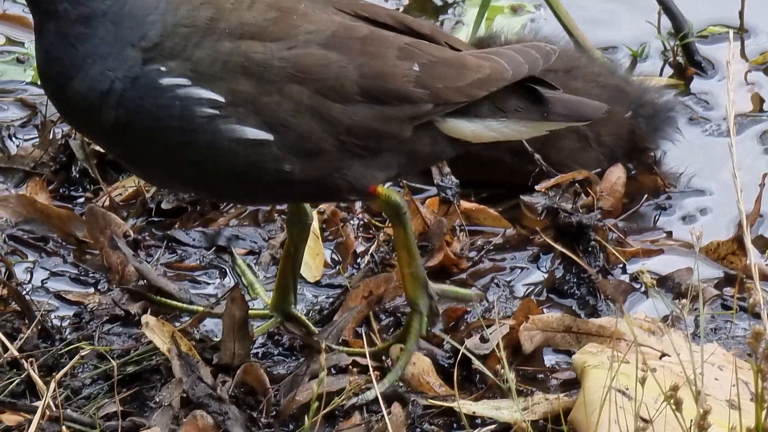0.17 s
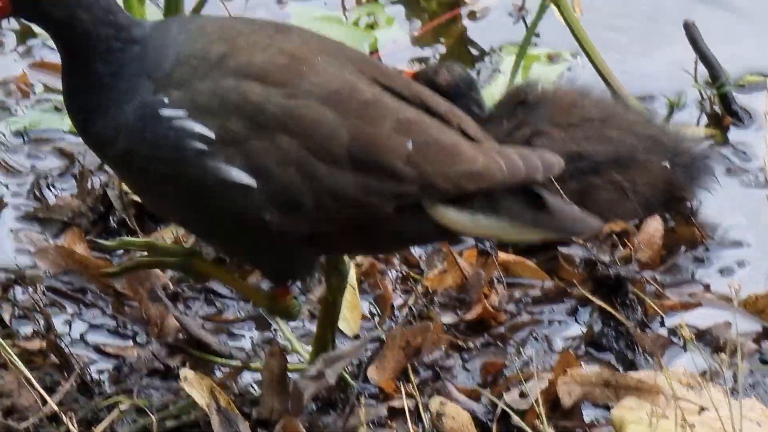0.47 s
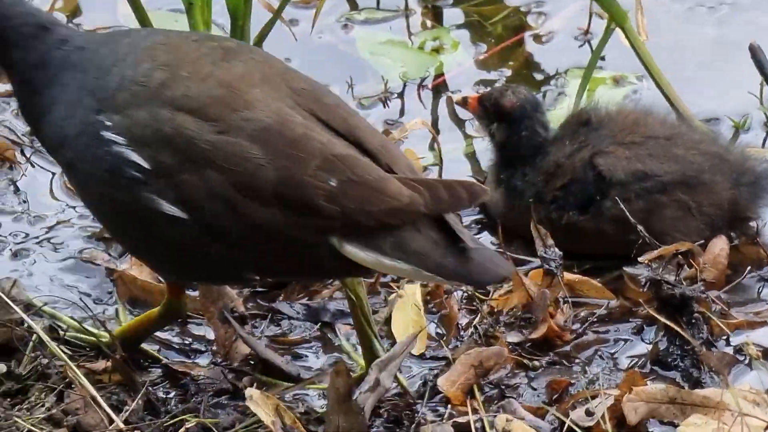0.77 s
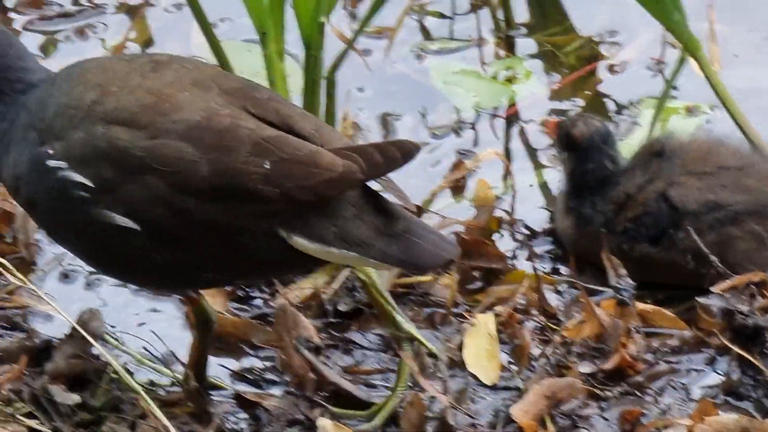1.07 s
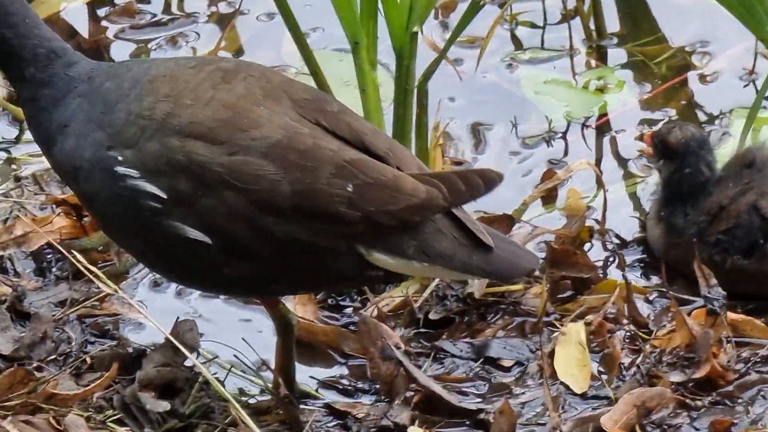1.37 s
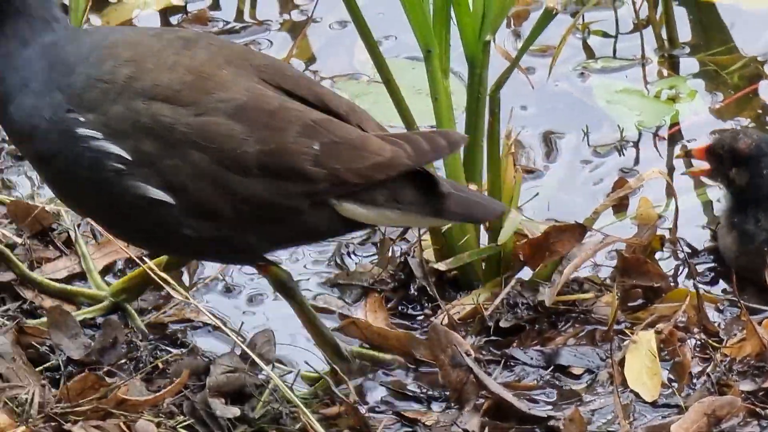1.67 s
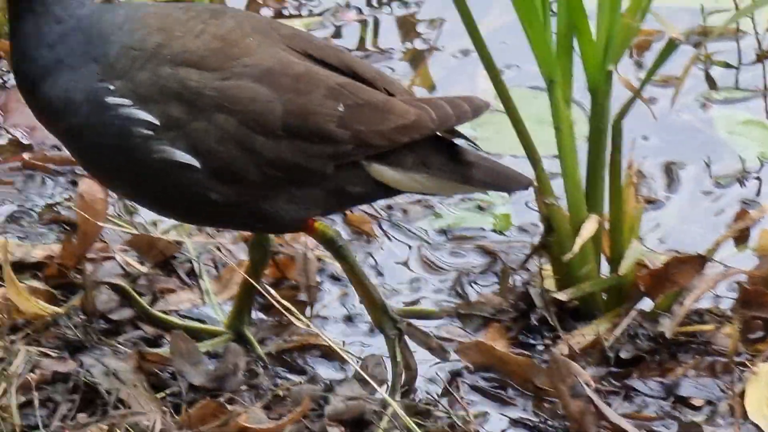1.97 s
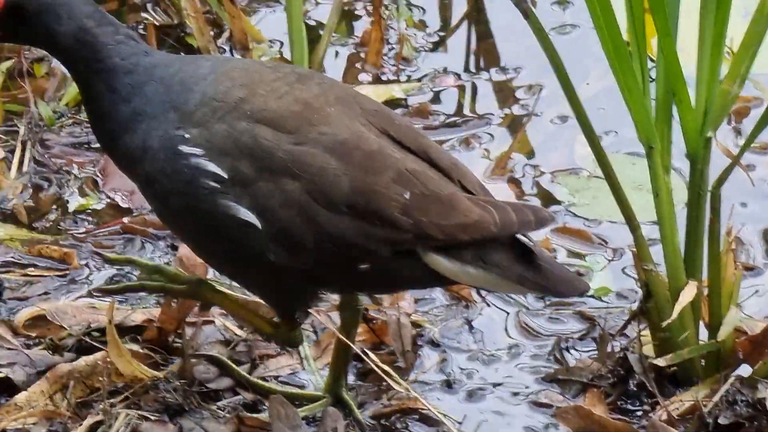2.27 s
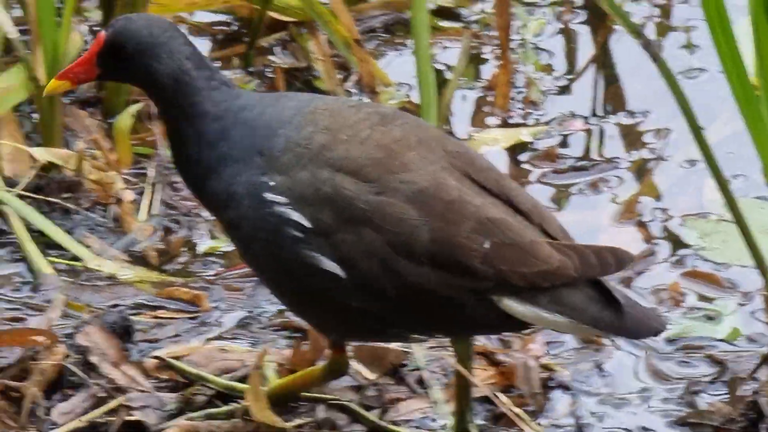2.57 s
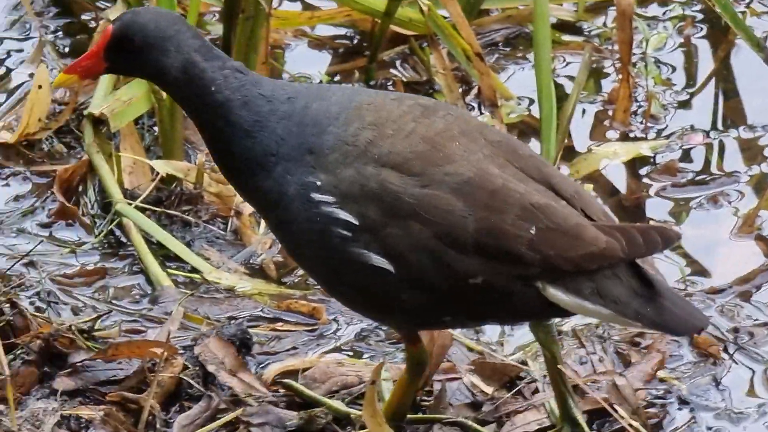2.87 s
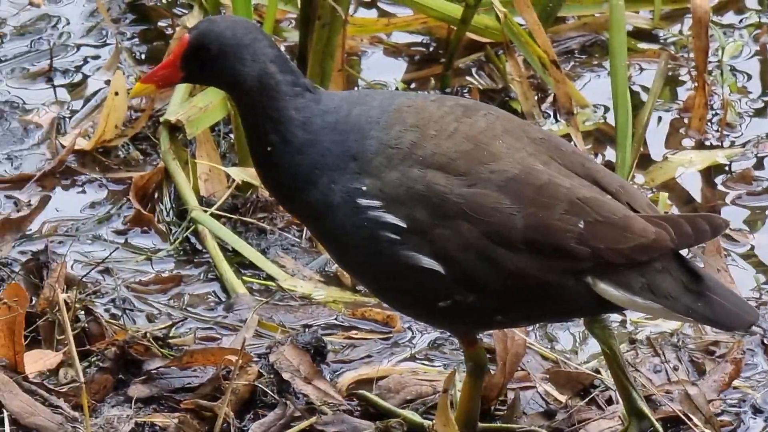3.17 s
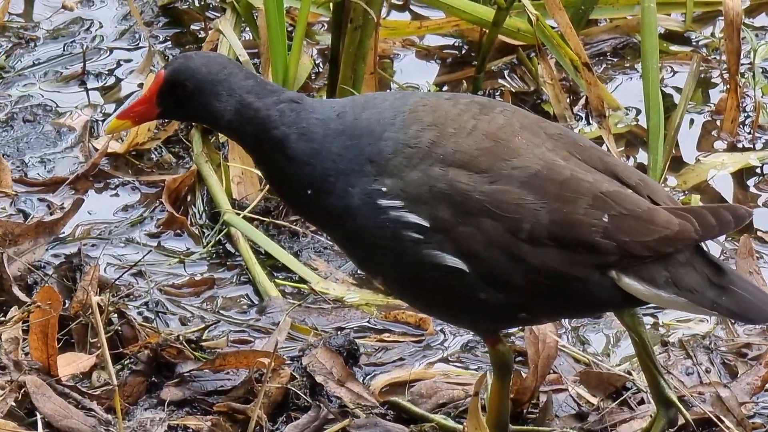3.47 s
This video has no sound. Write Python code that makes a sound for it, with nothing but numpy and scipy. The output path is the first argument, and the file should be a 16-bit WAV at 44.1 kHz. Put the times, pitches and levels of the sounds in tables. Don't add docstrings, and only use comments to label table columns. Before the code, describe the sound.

Harsh moorhen screeches, raspy chirps and one falling whistle at a quiet pond edge.

```python
import sys
import numpy as np
from scipy import signal
from scipy.fft import rfft, irfft
from scipy.io import wavfile
from scipy.ndimage import uniform_filter1d

SR = 44100
rng = np.random.default_rng(int(sys.argv[2]) if len(sys.argv) > 2 else 0)


def log_audio(samples):
    frames = np.atleast_2d(samples).T
    limited = np.clip(frames, -1, 1)
    pcm = np.round(limited * 32767).astype(np.int16)
    wavfile.write(sys.argv[1], SR, pcm)


def magnitude_from_level(level_db):
    exponent = np.asarray(level_db, float) / 20
    return 10 ** exponent


N = 159201
T = np.arange(N) / SR
LAG_S = 0.00003
JITTER_HZ = 400


def slow(hz):
    x = signal.lfilter(*signal.butter(2, hz, fs=SR), rng.standard_normal(N))
    return x / x.std()


def place(x, pan_db, lag_s=LAG_S):
    left = x * magnitude_from_level(pan_db / 2)
    right = np.roll(x, int(lag_s * SR)) * magnitude_from_level(-pan_db / 2)
    return np.array([left, right])


def bed(shape, db, step, swell_db, flicker_db):
    side_turn_hz, side_low_db, lean_db = 810, -14.5, -1.4
    f = np.fft.rfftfreq(N, 1 / SR) + 1e-9
    pts = np.array(shape)
    colour = magnitude_from_level(np.interp(np.log(f), np.log(pts[:, 0]), pts[:, 1], left=-60, right=-90))
    side = np.minimum(1, np.hypot(magnitude_from_level(side_low_db), (f / side_turn_hz) ** 1.48))
    mid_side = rfft(rng.standard_normal((2, N))) * colour * np.array([np.ones_like(f), side])
    where = np.log2(f / pts[0, 0]) / step
    bands = int(np.log2(pts[-1, 0] / pts[0, 0]) / step) + 2
    swell = slow(0.24)
    out = 0
    for k in range(bands):
        band = irfft(mid_side * np.clip(1 - abs(where - k), 0, 1), N)
        out = out + band * magnitude_from_level(swell_db * swell + flicker_db * slow(7.6))
    mid, side = out * magnitude_from_level(db) / out[0].std()
    return np.array([(mid + side) * magnitude_from_level(lean_db / 2), (mid - side) * magnitude_from_level(-lean_db / 2)])


def far_traffic():
    # (frequency [Hz], level [dB per Hz])
    rumble = [(16, -53), (28, -34.5), (42, -0.5), (64, 1.5), (210, -19), (303, -17), (370, -20), (491, -26),
              (1500, -36), (1950, -63), (3300, -120)]
    return bed(rumble, -48, 0.527, swell_db=0.0, flicker_db=0.52)


def open_air():
    # (frequency [Hz], level [dB per Hz])
    hiss = [(1500, 0), (3000, 3), (5000, -2.5), (7000, -6), (8200, -15.5), (10500, -20), (12000, -14.5),
            (16000, -13)]
    fade_db_s = -1.2
    return bed(hiss, -67.5, 0.513, swell_db=-1.0, flicker_db=0.77) * magnitude_from_level(fade_db_s * (T - T.mean()))


def machine_hum():
    hum_hz, hum_db = 300, -67.5
    return magnitude_from_level(hum_db + 1.4 * slow(14)) * np.sin(2 * np.pi * hum_hz * T + 0.15 * slow(13.0))


def leaves():
    # (time [s], level [dB])
    leaf_ticks = [(.82, -59), (.861, -59), (1.168, -52), (1.3, -57.5), (1.392, -63), (1.826, -76),
                  (2.027, -70), (2.274, -56.5), (2.431, -57), (2.753, -64), (3.365, -59)]
    drip_s, drip_hz, drip_db, drip_t60_s = 1.97, 560, -42, 0.011
    decay_s = 0.0024
    strength = sum(magnitude_from_level(db) * (T > s) * np.exp(-np.abs(T - s) / decay_s) for s, db in leaf_ticks)
    crack = strength * rng.standard_normal((2, N))
    u = np.maximum(T - drip_s, 0)
    drip = magnitude_from_level(drip_db - 60 * u / drip_t60_s) * np.sin(2 * np.pi * drip_hz * u)
    return signal.lfilter(*signal.butter(1, 4000, "high", fs=SR), crack) + drip


def trees(x):
    t60_s, gap_s, echo_db = 0.2, 0.00075, -8
    t = T[:SR // 2]
    tail = rng.standard_normal((2, len(t))) * magnitude_from_level(-60 * t / t60_s) * np.clip(t / gap_s, 0, 1)
    tail = signal.lfilter(*signal.butter(2, [2800, 7270], "band", fs=SR), tail)
    tail *= magnitude_from_level(echo_db) / np.sqrt(np.sum(tail ** 2, axis=1, keepdims=True))
    return signal.fftconvolve(x, tail, axes=1)[:, :N]


def throat(x, shape):
    hz, db = np.array(shape).T
    f = np.fft.rfftfreq(N, 1 / SR) + 1
    return irfft(rfft(x) * magnitude_from_level(np.interp(np.log(f), np.log(hz), db)), N)


def shake(rough):
    swell_db, flutter_hz = 3.5, 170
    swell = magnitude_from_level(swell_db * rough * slow(27))
    return swell * (np.sqrt(1 - rough) + np.sqrt(rough) * slow(flutter_hz))


def breath(rough):
    wheeze_db, rasp_db = -22, 1.5
    wheeze = magnitude_from_level(wheeze_db) * rough * np.diff(rng.standard_normal(N + 1))
    gape = signal.butter(3, [3300, 7200], "band", fs=SR)
    gusts = magnitude_from_level(rasp_db + 3.9 * slow(220)) * rough
    return wheeze + gusts * signal.lfilter(*gape, rng.standard_normal(N))


def syrinx(hz, gain, bright, rough, parts_db, sides_db, second_hz):
    jitter, second_jitter, first_side_db = 0.014, 0.033, -23
    rough = np.clip(rough, 0, 1)
    one = 2 * np.pi * np.cumsum(hz * (1 + jitter * rough * slow(JITTER_HZ))) / SR
    two = 2 * np.pi * np.cumsum(second_hz * (1 + second_jitter * slow(139))) / SR
    sides = [(j or -1, db) for j, db in enumerate(sides_db)]
    full = len(parts_db) > 0 and len(sides_db) > 0
    # (multiple of voice one, multiple of voice two, dB)
    upper = []
    for k, db in enumerate(parts_db):
        upper += [(k + 2, j, db + d) for j, d in [(0.00032, 0.033)] + sides]
    if not upper:
        upper = [(1, j, d) for j, d in sides]
    if full:
        upper += [(0.96, 1, first_side_db)]
    fundamental = shake(rough * (0.15 if full else 1)) * np.sin(one)
    overtones = sum(magnitude_from_level(db) * shake(rough) * np.sin(k * one + j * two) for k, j, db in upper)
    return np.sqrt(2) * gain * (fundamental + bright * (breath(rough) + overtones))


def call(rows, rough, parts_db=(), sides_db=(), second_hz=0):
    edge_s = 0.003
    s, hz, db, bright_db = np.array(rows).T
    gate = np.clip(np.minimum(T - s[0], s[-1] - T) / edge_s, 0, 1)
    pitch = np.interp(T, s, hz)
    gain = gate * magnitude_from_level(np.interp(T, s, db))
    return syrinx(pitch, gain, magnitude_from_level(np.interp(T, s, bright_db)), rough, parts_db, sides_db, second_hz)


def glides(rows, parts_db, rough, bend, rise):
    out = np.zeros(N)
    for start, length, hz0, hz1, db in rows:
        u = np.clip((T - start) / length, 0, 1)
        hz = (hz0 + (hz1 - hz0) * u ** bend) * (1 + rough * slow(JITTER_HZ))
        turn = 2 * np.pi * np.cumsum(hz) / SR
        swell = np.sin(np.pi * u ** rise)
        overtones = sum(magnitude_from_level(d) * np.sin((k + 2) * turn) for k, d in enumerate(parts_db))
        out += np.sqrt(2) * magnitude_from_level(db) * swell * (np.sin(turn) + swell ** 2 * overtones)
    return out


def far_notes():
    # (time [s], length [s], start pitch [Hz], end pitch [Hz], level [dB])
    across_pond = [(.116, 0.045, 4900, 4800, -58.5), (.67, 0.057, 5400, 5700, -67),
                   (1.455, 0.032, 4400, 3700, -60), (2.475, 0.027, 4850, 4800, -63),
                   (2.658, 0.025, 5400, 5400, -57), (2.82, 0.059, 3440, 3810, -64.5),
                   (2.6, 0.1, 5400, 6300, -67), (2.9, 0.018, 3950, 4100, -59),
                   (1.13, 0.029, 3950, 4250, -48), (1.155, 0.016, 4900, 4700, -52.5),
                   (1.935, .07, 5150, 5050, -61), (.482, .022, 4500, 5400, -43),
                   (.185, 0.056, 5950, 6300, -50)]
    return place(glides(across_pond, [], rough=0.042, bend=0.85, rise=0.78), pan_db=0.0)


def chirps():
    # (time [s], length [s], start pitch [Hz], end pitch [Hz], level
    # [dB])
    plain_notes = [(.83, 0.0096, 2520, 2520, -53.5), (.838, 0.012, 3330, 3300, -56),
                   (.88, 0.03, 4090, 4380, -46.5), (.925, 0.053, 5500, 5900, -49),
                   (1.174, 0.012, 2635, 2580, -46), (1.351, 0.025, 3950, 4730, -54.5),
                   (1.465, 0.022, 2600, 2685, -50.5), (1.468, 0.0075, 4970, 4800, -62),
                   (1.616, 0.017, 3600, 4450, -49.5), (1.628, 0.019, 4330, 4160, -48),
                   (1.695, 0.0094, 4420, 3940, -51), (1.708, 0.0075, 2680, 2580, -52.5),
                   (1.909, 0.0211, 3450, 4270, -52), (1.928, 0.018, 4050, 4150, -55),
                   (2.008, 0.011, 3430, 3370, -52), (2.038, 0.0051, 3640, 3650, -53),
                   (2.453, 0.03, 3800, 4950, -59), (2.495, 0.029, 5140, 4140, -54.5),
                   (2.615, 0.034, 5460, 5800, -56), (2.64, .02, 5800, 7250, -62.5),
                   (2.666, 0.018, 4730, 3850, -55), (2.676, 0.0079, 6800, 6820, -56),
                   (2.678, 0.021, 3620, 3390, -54), (2.595, 0.034, 4750, 5110, -58),
                   (2.625, 0.048, 4980, 5270, -59), (.19, 0.0084, 3000, 3300, -51.5),
                   (.507, 0.022, 6450, 6060, -35), (.235, 0.031, 4310, 3490, -56)]
    return place(glides(plain_notes, [], rough=0.0102, bend=0.86, rise=1.0), pan_db=2.0)


def chips():
    # (time [s], length [s], start pitch [Hz], end pitch [Hz], level [dB])
    loud_chip = [
        (.49, .045, 2454, 1792, -45),
    ]
    quick_chips = [
        (1.714, .02, 2140, 1890, -51.5),
        (2.017, 0.0232, 2263, 1730, -55),
    ]
    loud_parts = [5, 13, 0.5, 0.5, -16.5, -10]
    quick_parts = [9.5, 12.5, -3, -6.5, -15, -16]
    loud = glides(loud_chip, loud_parts, rough=0.024, bend=0.7, rise=0.96)
    quick = glides(quick_chips, quick_parts, rough=0.0163, bend=0.518, rise=0.74)
    return place(loud, pan_db=-3.4) + place(quick, pan_db=-1.5)


def rasps():
    # (time [s], length [s], pitch [Hz], second voice [Hz], level [dB])
    short_rasps = [
        (1.372, 0.11, 4132, 721, -57.5),
        (1.636, 0.075, 4114, 760, -59),
        (1.929, 0.085, 4060, 1040, -66),
    ]
    rasp_sides = [-12, 2.5, -6, -7.5]
    out = np.zeros(N)
    for s, length, hz, second_hz, db in short_rasps:
        rows = [(s, hz, db - 5.5, -4), (s + length, hz * 0.98, db, 1.5)]
        out += call(rows, rough=0.64, sides_db=rasp_sides, second_hz=second_hz)
    return place(out, pan_db=0.5)


def long_rasp():
    # (time [s], pitch [Hz], level [dB], overtones above it [dB])
    rasp_path = [(.85, 3393, -65, 3), (.89, 3437, -56, 7.5), (.955, 3450, -72, 7.9), (.965, 3568, -53.5, 5),
                 (1.0, 3682, -49, 2.9), (1.04, 3615, -44, 1.2), (1.12, 3510, -53, 3.5),
                 (1.17, 3410, -67, 6.9), (1.2, 3450, -70, 3.19)]
    long_sides = [-17, -7.5, -14, -7.5, -41, -13.5, -10.5, -32, -45, -49, -54]
    # (frequency [Hz], level [dB])
    rasp_throat = [(2800, -1.5), (3600, 0.5), (4200, 0), (4650, -3.5), (5300, 2.5), (6350, -4.5),
                   (7200, 2.5), (8300, -2.5)]
    x = call(rasp_path, rough=0.54, sides_db=long_sides, second_hz=663)
    return place(throat(x, rasp_throat), pan_db=-3.5)


def whistles():
    # (time [s], pitch [Hz], level [dB], overtones above it [dB])
    near_whistle = [(2.287, 2860, -57, -15), (2.3, 2860, -40.5, -14), (2.35, 2800, -44.5, -9),
                    (2.384, 2740, -48, -7), (2.4, 2643, -47, -12), (2.44, 2570, -60.5, -13)]
    far_whistle = [
        (2.43, 2603, -57.5, -8.5),
        (2.55, 2796, -66, -6.5),
        (2.68, 3164, -64, -25),
        (2.73, 3110, -72, -29),
    ]
    whistle_parts = [2, -15, -46, -21]
    near = call(near_whistle, rough=0.047, parts_db=whistle_parts)
    far = call(far_whistle, rough=0.65, parts_db=whistle_parts)
    return place(near, pan_db=2.5, lag_s=0.0004) + place(far, pan_db=3.5)


def first_screech():
    # (time [s], pitch [Hz], level of the fundamental [dB], overtones above it [dB])
    start_path = [(.122, 2214, -63.5, -1), (.18, 2145, -60.5, 11), (.2, 2161, -57.5, 13.5),
                  (.212, 1960, -66, 21.5), (.235, 1978, -60.5, 17), (.252, 2127, -52.5, 11),
                  (.275, 2082, -55, 9), (.293, 2054, -53, 14.5)]
    end_path = [(.291, 2270, -56.5, 15), (.31, 2313, -57.5, 12.7), (.325, 2140, -54, 10.4),
                (.36, 2195, -52, 7.5), (.394, 2211, -56, 8.7), (.404, 2007, -61, 18.3),
                (.44, 1940, -63.5, 18.5), (.475, 1963, -66.5, 25), (.495, 2210, -63, 21.6)]
    start_parts = [-8, -3.5, -13, -20.5]
    end_parts = [-9, -5, -9, -21]
    start_sides = [-8.5, -14]
    end_sides = [-10.5, -4]
    # (frequency [Hz], level [dB])
    first_throat = [(1800, 0), (2800, 0.5), (3300, -11), (4200, 1), (5200, 0), (5900, 2.5), (7000, -3),
                    (8000, -4)]
    start = call(start_path, rough=0.45, parts_db=start_parts, sides_db=start_sides, second_hz=760)
    end = call(end_path, rough=0.48, parts_db=end_parts, sides_db=end_sides, second_hz=772)
    return place(throat(start, first_throat), pan_db=0.0) + place(throat(end, first_throat), pan_db=-1.0)


def short_screech():
    # (time [s], pitch [Hz], level of the fundamental [dB], overtones above it [dB])
    cry_path = [
        (.885, 2094, -92, 6),
        (.905, 2264, -55.5, 2.5),
        (.955, 2278, -58.5, 8),
        (.965, 2230, -54, -31),
        (.985, 2290, -62, -15),
    ]
    cry_parts = [-1.3, 2, -15.5]
    return place(call(cry_path, rough=0.026, parts_db=cry_parts), pan_db=-5.0)


def last_screech():
    # (time [s], pitch [Hz], level of the fundamental [dB], overtones above it [dB])
    clear_path = [(2.897, 1980, -63, -12), (2.92, 2177, -50.5, -10), (2.94, 2305, -46, -13),
                  (2.952, 2417, -50, -2), (2.968, 2267, -47, -12), (2.992, 2350, -46.5, -4)]
    harsh_path = [(2.989, 2298, -48, 5), (3.04, 2338, -48.5, 6.5), (3.066, 2435, -47, 10.5),
                  (3.076, 2326, -48, 6), (3.084, 2403, -42.5, -4), (3.098, 2313, -52.5, 1),
                  (3.11, 2220, -40, -11), (3.122, 2400, -55, -6), (3.132, 2400, -70, -3)]
    last_parts = [-0.72, -10, -18]
    last_sides = [-17.5, -16, -19]
    # (frequency [Hz], level [dB])
    last_throat = [(2400, -0.5), (3300, -5.5), (4000, 1), (4750, 1.5), (7100, 1), (8000, -3), (9800, 9),
                   (11000, -7)]
    lag_s = -0.00007
    clear = call(clear_path, rough=0.12, parts_db=last_parts)
    harsh = call(harsh_path, rough=0.25, parts_db=last_parts, sides_db=last_sides, second_hz=754)
    return place(clear, pan_db=-1.5, lag_s=lag_s) + place(throat(harsh, last_throat), pan_db=-2.0, lag_s=lag_s)


def scene():
    background = far_traffic() + open_air() + machine_hum() + leaves()
    birds = far_notes() + chirps() + chips() + rasps() + long_rasp() + whistles()
    birds = birds + first_screech() + short_screech() + last_screech()
    return background + trees(birds) + birds


def top_cut(x):
    return signal.sosfilt(signal.butter(12, 16250, fs=SR, output="sos"), x)


def record(dry):
    open_s, shut_db, pop_db, pop_decay_s = 0.1125, -25.5, -28, 0.0012
    port_hz, port_db, top_hz = 11600, 9, 15830
    dip_hz, dip_width_hz, dip_db = 7770, 440, -4.5
    u = np.maximum(T - open_s, 0)
    rebound = 0.28 * np.sin(2 * np.pi * 60 * u) * np.exp(-u / 0.012)
    pop = magnitude_from_level(pop_db) * (T > open_s) * (np.exp(-u / pop_decay_s) - rebound)
    opening = np.where(T > open_s, 1, magnitude_from_level(shut_db) * np.clip(T / open_s, 0, 1) ** 3)
    x = dry * opening + uniform_filter1d(pop, size=3)
    f = np.fft.rfftfreq(N, 1 / SR)
    tilt = magnitude_from_level(np.outer([-port_db / 2, port_db / 2], np.clip((f - port_hz) / 600 + 0.5, 0, 1)))
    dip = magnitude_from_level(dip_db * np.exp(-((f - dip_hz) / dip_width_hz) ** 2))
    mix = irfft(rfft(x) * tilt * (f < top_hz) * dip, N)
    return top_cut(mix)


dry = scene()
out = record(dry)
log_audio(out)
```